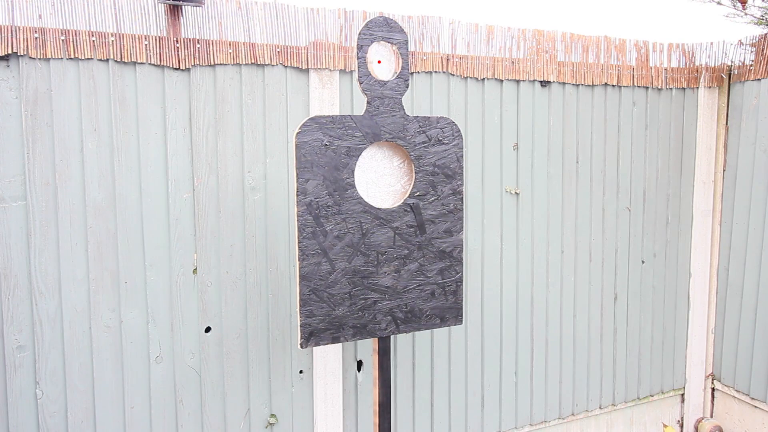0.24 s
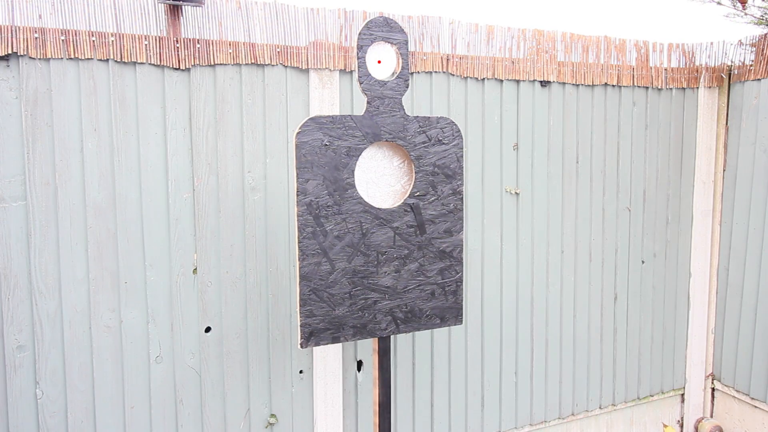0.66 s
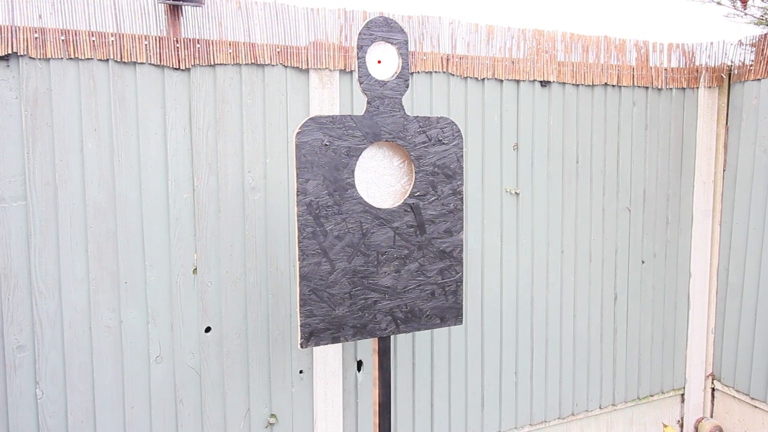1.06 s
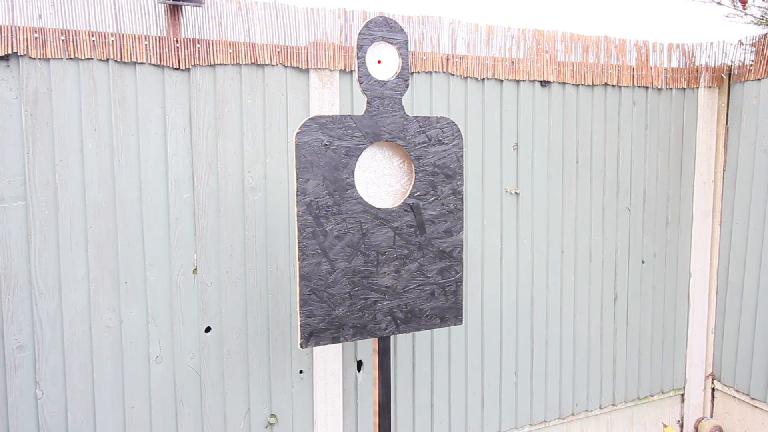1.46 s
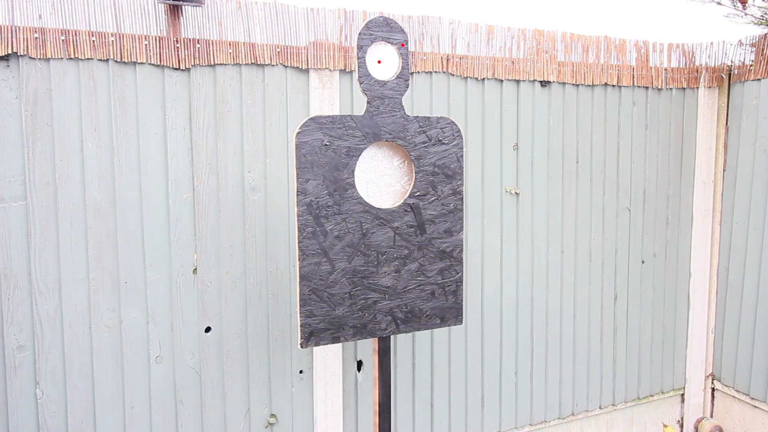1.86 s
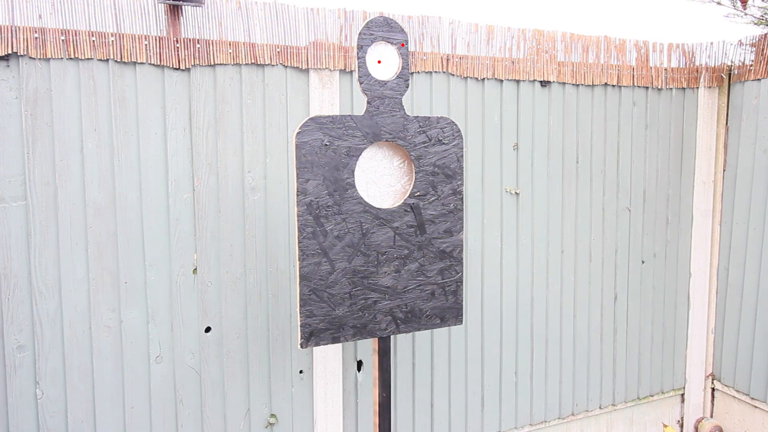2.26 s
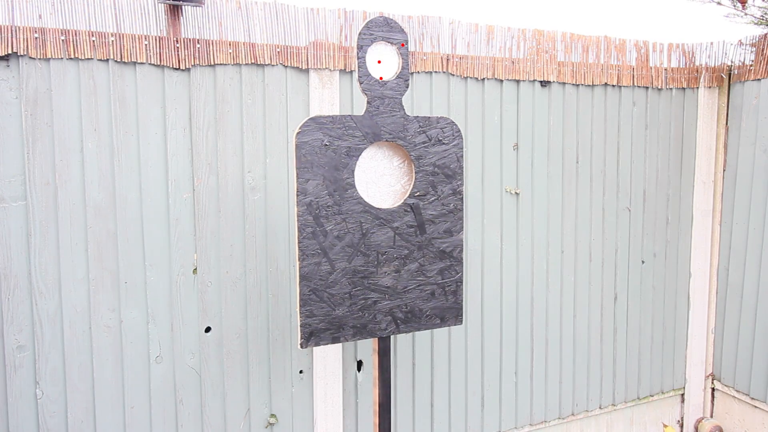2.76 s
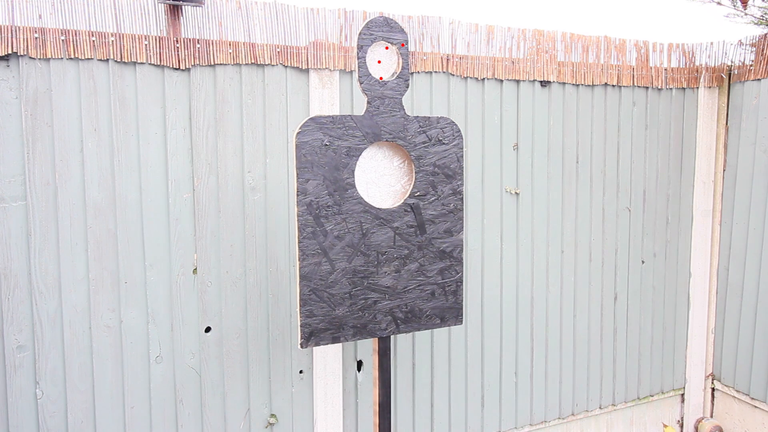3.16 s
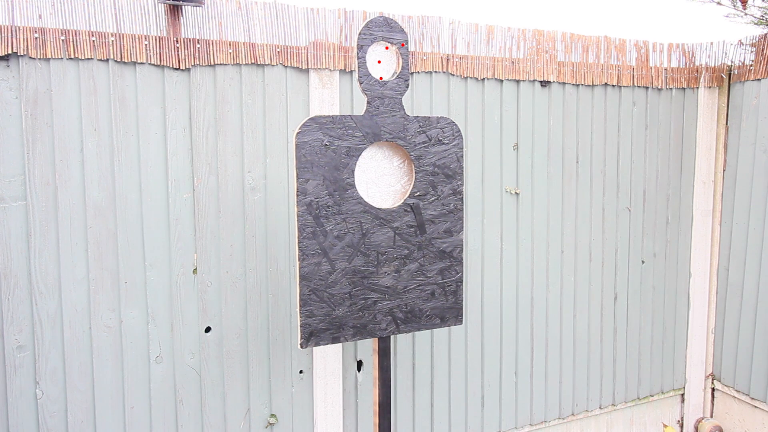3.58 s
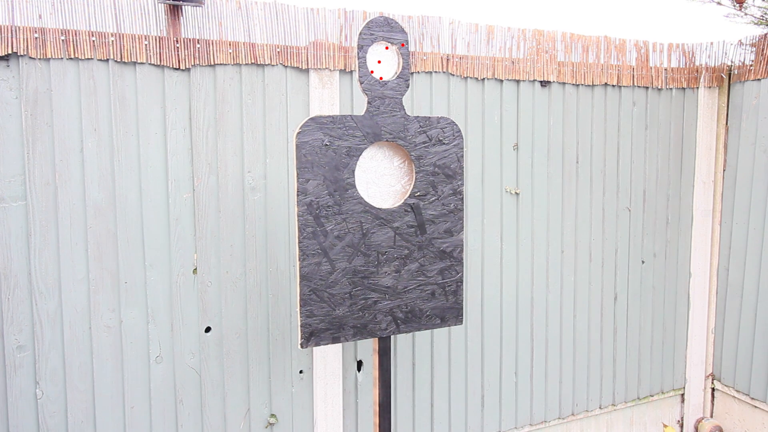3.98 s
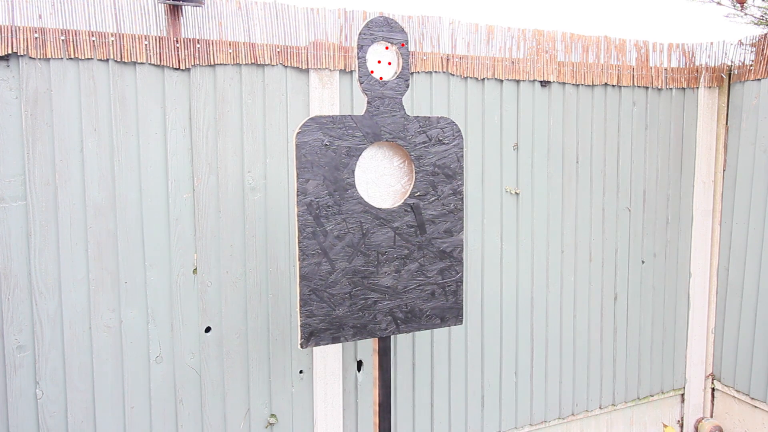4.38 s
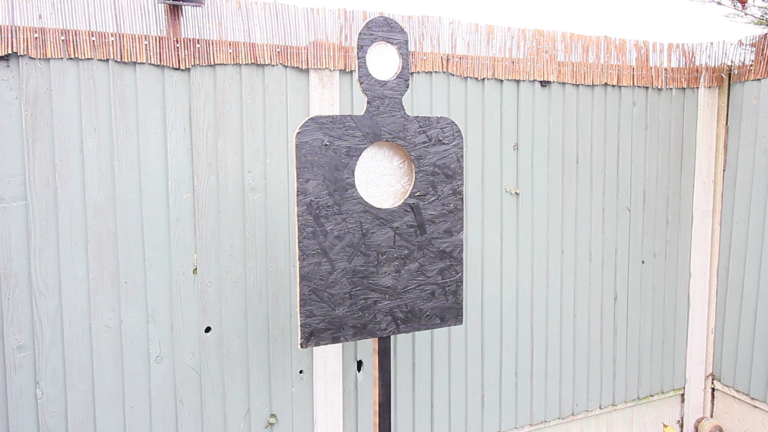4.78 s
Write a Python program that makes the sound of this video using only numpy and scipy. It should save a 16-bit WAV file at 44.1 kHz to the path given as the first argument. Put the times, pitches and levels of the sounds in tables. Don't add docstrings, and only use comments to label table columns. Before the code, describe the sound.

Near microphone at a target board outdoors: each shot is a hollow pop with a gas puff, a brief rising hiss, then a sharp crack some 85 milliseconds later and a ringing tail. The first hit comes immediately, then a quieter gap with small metallic clicks, then five spaced shots. The background ducks at each bang and swells back with traffic rumble and gusty wind; three abrupt cuts change the ambience.

```python
import sys
import numpy as np
from scipy import signal
from scipy.fft import rfft, irfft
from scipy.io import wavfile
from scipy.ndimage import uniform_filter1d

SR = 44100
rng = np.random.default_rng(int(sys.argv[2]) if len(sys.argv) > 2 else 0)


def store_wav(level_fs):
    pcm = np.round(np.clip(np.atleast_2d(level_fs), -1, 1) * 32767)
    wavfile.write(sys.argv[1], SR, pcm.T.astype(np.int16))


def natural_amplitude(level_db):
    exponent = np.asarray(level_db, float) / 20
    return 10 ** exponent


N = 221689

SHOT_TIMES = [-.0535, 1.7574, 2.352, 3.0475, 3.7779, 4.394]
# t/s, crack level/dB, board ring level/dB, yard tail level/dB
HITS = [
    (0.0334, -5.5, -9, -22),
    (1.8425, -1.5, -16.5, -20),
    (2.4381, -3.5, -16, -19.5),
    (3.1337, -8.5, -7, -22),
    (3.8641, -5, -17.5, -19),
    (4.4813, -6, -10, -22.5),
]
CHANGES = [-1, .378, 3.438, 4.728, 9]
# gain at its start/dB, opening rumble level/dB, rumble fade/(dB/s)
TAKES = [(-25, -63, 10), (-14, -53, 110), (-20.5, -55, 200), (-10, -56, 40)]
# f/Hz, level/dB
SCATTER = [(88, -42), (150, -4), (303, -14.5), (439, -2), (1340, -6.5), (1500, -1), (1900, -8),
           (2060, -5.5), (4080, -5.5), (5680, -13.5), (16000, -28.5)]


def evened(x):
    return x / np.sqrt(np.mean(x ** 2) + 1e-20)


def read(points, hz):
    f, value = np.transpose(points)
    return np.interp(np.log(hz + 1), np.log(f + 1), value)


def add(mix, s, sound):
    take = np.searchsorted(CHANGES, s + np.argmax(abs(sound)) / SR)
    begin, end = max(CHANGES[take - 1], 0) * SR, min(CHANGES[take] * SR, N)
    at = round(s * SR) + np.arange(len(sound))
    heard = (at >= begin) & (at < end)
    mix[at[heard]] += sound[heard]


def highpass(x, hz):
    return signal.lfilter(*signal.butter(2, hz, "high", fs=SR), x)


def resonance(x, hz, width):
    return signal.lfilter(*signal.iirpeak(hz, hz / width, SR), x)


def noise(colour, size, t60=None, patchy_db=0.):
    hz = np.fft.rfftfreq(256, 1 / SR)
    t = np.arange(size // 64 + 5) * 64 / SR
    a, b, patches = rng.standard_normal((len(t), len(hz), 3)).T
    patches = uniform_filter1d(patches, size=3, axis=0)
    patches = evened(uniform_filter1d(patches, size=30, axis=1))
    shape = natural_amplitude(read(colour, hz))
    shape = shape / np.linalg.norm(shape)
    fade_db = -60 * t / read(t60, hz)[:, None] if t60 else 0
    z = (a + 1j * b) * shape[:, None] * natural_amplitude(fade_db + patchy_db * patches)
    return signal.istft(z, nperseg=256, noverlap=192)[1][:size]


def coloured(x, colour):
    gain = natural_amplitude(read(colour, np.fft.rfftfreq(len(x), 1 / SR)))
    return evened(irfft(rfft(x) * gain, len(x)))


def lingering(bands, t60, size):
    t = np.arange(size) / SR
    out = np.zeros(size)
    for hz, width, db in bands:
        width = max(width, 45)
        held = resonance(resonance(rng.standard_normal(size), hz, width), hz, width)
        out += natural_amplitude(db - 60 * t / read(t60, hz)) * evened(held)
    return out


def shot(pop_db, ring_db, scatter_db, hiss_db, yard):
    # t/ms, level/dB
    arrivals = [(0.1, -3), (1.58, -4.5), (2.78, -3.1), (4.03, -6.5), (5.75, -4.2), (7.77, -6.5),
                (12.39, -0.2), (13.05, -11.1), (13.8, -5.9), (14.37, -5.2), (16.32, -13.5), (17.68, -9.8),
                (19.65, -7.7), (21.6, -10.0)]
    # f/Hz, level/dB, start/ms, swell/ms, crest/ms
    barrel = [(763, -6.5, -2.5, 1.36, -0.02), (275, -15.5, -3.5, 2.8, -0.52), (400, -20, 3, 2.2, -0.34),
              (1040, -17, 0, 1.4, 0.12), (435, -24, 8, 5, 0), (930, -22, 3, 3.5, 0)]
    # t/ms, level/dB
    echoes = [(-5, -18), (0, -14), (3, -2), (10, 1), (14.5, 4), (19, 1.5), (25, -3.5), (47, -2.5),
              (58, -9.5), (89, -9.5), (220, -50)]
    # f/Hz, level/dB
    pellet = [(180, -43), (300, -21.5), (1080, -8), (1280, -5), (2140, -1), (2480, -2.5), (4990, -12),
              (8090, -16.5), (16000, -30.5)]
    ms = np.arange(len(yard)) * 1000 / SR - 5
    spikes, ring = 0, 0
    for at, db in arrivals:
        push = np.exp(-.5 * ((ms - at) / .046) ** 2)
        suck = np.exp(-.5 * ((ms - at + .3) / .19) ** 2)
        spikes = spikes + natural_amplitude(db) * (push - .242 * suck)
    for hz, db, start, swell, crest in barrel:
        u = np.maximum(ms - start, 0) / swell
        ring = ring + natural_amplitude(db) * u ** 2 * np.exp(-u) * np.cos(2 * np.pi * hz * (ms - crest) / 1000)

    walls = 0.7 * yard + 0.52 * noise(SCATTER, len(ms), patchy_db=-2.0)
    bass = walls - highpass(walls, 600)
    slats = resonance(walls, 1700, 600)
    late = 1 / (1 + np.exp((30 - ms) / 3))
    walls = walls + (natural_amplitude(-3) * slats - .4 * bass) * late
    scatter = natural_amplitude(scatter_db + np.interp(ms, *np.transpose(echoes))) * walls

    closing_db = np.where(ms < 87, hiss_db + 0.49 * (ms - 80), -120)
    hiss = natural_amplitude(closing_db) * noise(pellet, len(ms), patchy_db=0.5)
    return natural_amplitude(pop_db) * (spikes + natural_amplitude(ring_db + 3.5) * ring + scatter) + hiss


def jet(pop_db):
    # f/Hz, level/dB
    gas = [(2350, -33.5), (4000, -2.5), (8390, -3.5), (15200, -6), (16200, -15), (16500, -49)]
    leak_db, jet_db, jet_ms = -44, -29, 5
    ms = np.arange(2000) * 1000 / SR - 5
    puff = np.where(ms < 0, natural_amplitude(leak_db), natural_amplitude(jet_db) * np.exp(-ms / jet_ms))
    return natural_amplitude(pop_db) * puff * coloured(rng.standard_normal(len(ms)), gas)


def fire_pistol(gun):
    levels = [
        (-9, -3, -17, -25.5),
        (-3.5, 4.5, -18.5, -27.5),
        (-12, 0.5, -15.5, -28.5),
        (-7, -1, -19.5, -27.5),
        (-4.5, -1, -20, -32.5),
        (-9.5, -0.5, -17, -26.5),
    ]
    yard = noise(SCATTER, 9500, patchy_db=0.0)
    for s, row in zip(SHOT_TIMES, levels):
        add(gun, s - .005, shot(*row, yard))
        add(gun, s - .005, jet(row[0]))


def burst(t, ms, tau):
    return np.exp(-np.maximum(t - ms / 1000, 0) / tau) * (t >= ms / 1000)


def through(colour, path):
    return [(hz, .6 * read(colour, hz) + read(path, hz)) for hz in np.geomspace(200, 16000, 60)]


def hit(crack_db, ring_db, near_db, colour, bands, returns):
    # t/ms, level/dB
    house = [(110, -44.5), (122.5, -44.5), (137, -50), (150, -52)]
    # f/Hz, level/dB
    wall = [(300, 1), (1500, 2), (4000, 0), (6500, 3), (9000, -14), (16000, -25)]
    # f/Hz, level/dB
    far_path = [(300, 7.5), (500, 1), (1200, 3.5), (2200, 2), (4000, -2), (6500, -4.5), (9000, -3),
                (12000, -9), (16000, -22)]
    # f/Hz, T60/s
    near_t60 = [(300, 0.19), (2000, .12), (6000, 0.13), (15000, 0.08)]
    far_t60 = [(300, 0.55), (1500, .7), (4000, 0.65), (8000, 0.42), (12000, 0.4), (15000, .22)]
    t = np.arange(30000) / SR
    cracks = sum(natural_amplitude(db) * burst(t, ms, .00145) for ms, db, _ in returns)
    slaps = sum(natural_amplitude(db) * burst(t, ms, .0056) for ms, db in house)
    slaps = slaps * noise(through(colour, wall), len(t))
    direct = highpass(natural_amplitude(crack_db) * (noise(colour, len(t)) * cracks + slaps), 280)
    board = sum(natural_amplitude(db + 9) * resonance(direct, hz, width) for hz, width, db in bands)
    near = noise(colour, len(t), near_t60, 1.5)
    far = noise(through(colour, far_path), len(t), far_t60, 2.2)
    far = far + natural_amplitude(-6.5) * lingering(bands, far_t60, len(t))
    tails = (1 - np.exp(-t / .004)) * (natural_amplitude(near_db) * near + natural_amplitude(near_db - 21) * far)
    return direct + natural_amplitude(ring_db) * board + tails


def plate(modes, returns):
    snap_s, swell_s = .00035, .003
    t = np.arange(18000) / SR
    ring = sum(natural_amplitude(db - 60 * t / t60) * np.sin(2 * np.pi * hz * t) for hz, db, t60 in modes)
    ring = ring * (1 - np.exp(-t / swell_s))
    snaps = 0
    for ms, _, db in returns:
        since = t - ms / 1000
        snaps = snaps + natural_amplitude(db) * np.exp(-abs(since - snap_s / 2) / snap_s) * (since >= 0)
    return ring + snaps * evened(highpass(rng.standard_normal(len(t)), 8000))


def strike_board(gun):
    # f/Hz, level/dB
    colours = [
        [(180, -61), (300, -35.5), (1930, -13.5), (2250, -2), (2790, -20.5), (4370, -7), (5080, -22.5),
         (6520, -14.5), (16000, -18.5)],
        [(180, -49.5), (300, -19), (678, -10), (1340, -15.5), (1580, -7), (2570, -9), (4590, -2.5), (5250, -5),
         (16000, -28)],
        [(180, -58.5), (300, -36), (650, -29), (1250, -11), (1580, -2), (1750, -13.5), (1870, -10),
         (3240, -11.5), (4830, -3), (8500, -15), (16000, -32)],
        [(180, -59), (300, -32.5), (2030, -14), (2250, -2.5), (2840, -15), (4370, -4.5), (5160, -16.5),
         (5900, -2.5), (16000, -14.5)],
        [(180, -46), (300, -22.5), (1170, -9.5), (1510, -7), (1750, -15), (2930, -4), (5800, -12), (8790, -9.5),
         (16000, -14.5)],
        [(180, -56.5), (300, -36.5), (2000, -18), (2250, -5), (2840, -11), (4440, -2), (4910, -11),
         (6520, -8.5), (16000, -18.5)],
    ]
    # f/Hz, width/Hz, level/dB
    bands = [
        [(2277, 60, -7), (3640, 150, -9), (4231, 160, -10), (6350, 320, -5.5), (8100, 290, -6)],
        [(1034, 60, -9), (1680, 150, .5), (1970, 150, 0), (2850, 200, -5), (4740, 400, -5), (6650, 450, -6.5)],
        [(1620, 110, -2), (2050, 140, 0), (4500, 500, -10), (7400, 880, -12.5)],
        [(444, 34, -3.5), (4500, 450, -6), (5900, 260, 0), (6500, 200, -3), (8500, 500, -5), (11200, 400, -9.5)],
        [(1190, 46, -3), (2030, 130, -1.5), (6330, 400, -27), (8610, 600, -6), (9860, 500, -9)],
        [(420, 60, -3), (2240, 60, -8), (3730, 70, -5), (4460, 70, -5), (6500, 350, -2), (7750, 300, -13)],
    ]
    # t/ms, level/dB, bright snap level/dB
    returns = [
        [(0, 0, -13), (2.9, -1, -10), (5.3, -4, -17), (7.1, -6, -28), (11, -17, -34), (16, -19, -34)],
        [(0, 0, -14), (3.2, 0, -16), (5.3, -5, -28), (7.2, -7, -25), (10.5, -17, -36), (12.5, -18, -36)],
        [(0, 0, -21), (3.1, -1, -21), (5.3, -3, -21), (7, -7, -30), (9.5, -17, -38), (12.5, -19, -38)],
        [(0, 1, -10), (3.2, -1, -8), (5.1, -5, -16), (7.7, -7, -22), (12.2, -16, -27), (15.9, -17, -30)],
        [(0, 0, -9), (2.9, -2, -8), (5.3, -3, -15), (7.5, -8, -23), (10.5, -16, -32), (14, -17, -33)],
        [(0, 3, -8), (2.8, -1, -7), (5.3, -4, -13), (7.2, -8, -27), (10, -17, -31), (13.5, -18, -35)],
    ]
    # f/Hz, level/dB, T60/s
    modes = [
        [(2250, -14, .045), (4242, -18, .06), (6513, -28, .05), (8306, -22, .06), (2277, -40, .22)],
        [(1593, -22, .09), (1927, -25, .09), (3036, -22, .05), (3919, -24, .05), (4699, -20, .05)],
        [(1593, -19, .09), (1862, -24, .1), (4699, -19, .04), (5485, -21, .04)],
        [(2255, -29, .07), (4521, -25, .07), (6013, -20, .07), (6702, -18, .06), (8850, -23, .07),
         (5860, -40, .18), (5960, -44, .2), (6480, -50, .3)],
        [(1507, -26, .07), (2164, -27, .07), (3036, -26, .06), (3956, -23, .05), (4640, -24, .05),
         (8597, -21, .05)],
        [(2234, -19, .065), (3730, -31, .12), (4500, -20, .07), (6352, -22, .05), (6729, -20, .05),
         (2240, -41, .25), (3735, -54, .7), (4447, -43, .2), (5846, -36, .12)],
    ]
    for (s, *levels), colour, band, paths, mode in zip(HITS, colours, bands, returns, modes):
        add(gun, s, hit(*levels, colour, band, paths))
        add(gun, s, plate(mode, paths))


def click(db, hz, t60, rustle):
    t = np.arange(9000) / SR
    rattle = rng.standard_normal(len(t)) * natural_amplitude(-60 * t / t60)
    held = resonance(rattle, hz, hz / 26)
    broad = resonance(rattle, hz, hz / .9)
    rustle = np.clip(rustle, 0, 1)
    return natural_amplitude(db) * ((1 - rustle) * held / abs(held).max() + rustle * broad / abs(broad).max())


def splinters(db):
    # f/Hz, level/dB
    colour = [(180, -65), (300, -37), (456, -17.5), (660, -19.5), (987, -8), (1630, -5.5), (2650, -4),
              (6780, -12), (15200, -6), (16500, -24)]
    # f/Hz, width/Hz, level/dB
    metal = [(996, 67, -6), (1440, 58, -3.5), (1800, 90, -7), (2820, 90, -9), (3260, 45, -6),
             (3650, 60, -7), (8340, 50, -6), (11600, 60, -11)]
    # f/Hz, T60/s
    t60 = [(500, 0.99), (1500, 0.71), (4000, 0.45), (9000, .28), (15000, 0.18)]
    t = np.arange(20000) / SR
    patter = noise(colour, len(t), t60, 3.) + natural_amplitude(-9.5) * lingering(metal, t60, len(t))
    return natural_amplitude(db) * patter * (1 - 0.4 * np.exp(-t / 0.015))


def rain_splinters(gun):
    # t/s, level/dB, f/Hz, T60/s, share of broad rustle
    tinkles = [(4.0185, -34, 2650, .1, .4), (4.023, -38, 4550, .1, .4), (4.02, -43, 6500, .15, .9),
               (4.088, -46, 1000, .07, .05), (4.062, -45, 3260, .3, 0), (4.165, -52, 3250, .12, 0),
               (4.033, -50, 1000, .25, 0), (3.252, -48, 5900, .06, .1), (1.955, -48, 1030, .12, 0),
               (1.995, -52, 1600, .45, 0), (4.515, -48, 500, .25, .05), (4.57, -58, 300, .3, 0),
               (3.195, -50, 440, .25, .05), (3.23, -62, 220, .3, 0), (.152, -44, 2600, .03, .9),
               (.143, -50, 6700, .03, .2), (3.9, -46, 900, .15, .3), (4.08, -51, 1460, .7, 0),
               (4.13, -52, 1000, .7, 0), (3.2, -54, 5950, .6, 0)]
    add(gun, 4.0185, splinters(-41.5))
    for s, *voice in tinkles:
        add(gun, s, click(*voice))


def handle_pistol(mix):
    # t/s, level/dB, f/Hz, T60/s, share of broad rustle
    touches = [(0.309, -57, 5200, .02, 0.85), (.381, -62, 9300, .02, 0.12), (0.384, -52, 4300, 0.095, 0.3),
               (0.387, -60, 9000, .02, .15), (.3925, -58, 9400, .02, .15), (.3925, -50, 3900, 0.044, 0.4),
               (.385, -48, 540, 0.15, 0.4), (.386, -54, 1500, .1, .7), (0.407, -50, 2900, 0.17, .1),
               (.414, -58, 5450, 0.033, 0.34), (.62, -63.5, 6450, .15, .1), (.7592, -52, 4970, 0.033, 0.76),
               (.7721, -49.5, 6000, .04, 0.67), (0.7773, -41.5, 3570, 0.12, 0.65),
               (1.314, -52, 5000, .03, 0.81), (3.441, -54, 3880, .04, 0.44), (3.452, -57, 4500, .04, .4),
               (3.668, -60, 3600, 0.018, .6), (3.6685, -51.5, 5000, .02, 0.68), (3.736, -56, 1850, 0.1, .2),
               (3.52, -55, 660, 0.49, .1), (3.61, -52.5, 634, 0.53, .1), (4.602, -43, 3800, .035, .8),
               (4.729, -56, 2860, .5, .1), (4.73, -68, 6350, 0.34, .1)]
    for s, *voice in touches:
        add(mix, s, click(*voice))


def buffet(db, hz, push):
    u = np.arange(-.03, .03, 1 / SR) * hz
    return np.sign(push) * natural_amplitude(db) * np.cos(2 * np.pi * u) * np.exp(-(u / 0.55) ** 2)


def bump_microphone(mix):
    # t/s, level/dB, f/Hz, push or pull
    eddies = [(1.9924, -43.5, 107, 1), (2.01, -43.5, 175, -1), (2.0247, -48, 130, -1),
              (2.0588, -46, 85.6, 1), (2.0897, -38, 147, -1), (2.1034, -36, 155, -1), (2.138, -48.5, 98, 1),
              (2.1533, -43.5, 121, 1), (2.179, -43.5, 138, 1), (2.2574, -46, 141, 1), (2.27, -34, 143, 1),
              (2.2928, -35.5, 124, -1), (2.323, -39, 138, -1), (2.339, -42.5, 95, -1),
              (2.7905, -48.5, 143, 1), (2.8902, -42, 117, 1), (2.996, -47, 136, -1), (3.526, -43, 110, 1),
              (3.575, -42, 70, -1), (3.5967, -36, 99, 1), (3.6096, -35, 119, 1), (3.6581, -32.5, 79, 1),
              (3.677, -31, 195, -1), (3.696, -36, 83, -1), (3.7146, -35, 64, -1), (3.7302, -27, 146, 1),
              (3.7573, -34, 65, 1), (3.97, -51.5, 79, -1), (4.2696, -45, 102, 1), (4.288, -45, 73, 1),
              (2.086, -46, 520, 1), (2.102, -46, 330, -1), (2.275, -43, 330, 1), (3.672, -42, 400, 1),
              (3.683, -42, 330, -1), (3.722, -40, 420, 1), (3.735, -42, 350, -1), (1.995, -52, 350, 1)]
    # t/s, level/dB, f/Hz, upward or downward swing
    low_thumps = [(1.7595, -33, 140, -1), (3.0495, -47, 140, -1), (4.396, -47, 140, -1), (1.845, -33, 90, -1),
                  (2.439, -37, 100, 1), (3.135, -52, 100, -1), (3.865, -40, 110, 1)]
    for s, *eddy in [*eddies, *low_thumps]:
        add(mix, s - .03, buffet(*eddy))


def drone(db, hz, width, fall):
    t = np.arange(-.4, .4, 1 / SR)
    held = resonance(resonance(rng.standard_normal(len(t)), hz, width), hz, width)
    return natural_amplitude(db - 9 * (t / fall) ** 2) * evened(held)


def pass_drones(mix):
    swells = [(.87, -50.5, 247, 14, .17), (.98, -57, 305, 20, .1), (1.06, -56, 1000, 40, .1),
              (1.2, -54, 950, 300, .12), (.75, -56, 1000, 300, .12), (1.33, -52, 310, 40, .05),
              (1.43, -49, 160, 60, .1), (1.4, -50, 360, 200, .1), (1.36, -54, 700, 200, .07),
              (.43, -63, 230, 60, .05), (.45, -60, 400, 80, .08), (.55, -58, 270, 30, .05),
              (4.95, -54, 260, 40, .12)]
    for s, *band in swells:
        add(mix, s - .4, drone(*band))


def gain_control(t):
    crack_duck_db, pop_duck_db, recover_db_per_s, knee_db = -37, -22, 44, 2.5
    resets = [(row[0], crack_duck_db) for row in HITS]
    resets += [(s, pop_duck_db) for s in SHOT_TIMES[1:]]
    resets += [(max(s, 0), take[0]) for s, take in zip(CHANGES, TAKES)]
    s, db = np.transpose(sorted(resets))
    last = np.searchsorted(s, t, side="right") - 1
    climb_db = db[last] + recover_db_per_s * (t - s[last])
    return -knee_db * np.logaddexp(0, -climb_db / knee_db)


def wind(t):
    # peak t/s, level/dB, time to rise 20 dB/s, time to fall 20 dB/s
    gusts = [(1.15, -51, .4, .15), (1.31, -40, .05, .4), (1.44, -39, .08, .5), (1.745, -36, .04, .03),
             (2.08, -19, .25, .14), (2.265, -21, .04, .3), (2.78, -35, .07, .12), (2.886, -33, .08, .06),
             (3.035, -41, .11, .05), (3.44, -30, .03, .6), (3.765, -26, .4, .025), (3.97, -25, .2, .045),
             (4.278, -33, .11, .09)]
    # f/Hz, level/dB
    colour = [(12, -39.5), (20, -8), (92, -3), (220, -10.5), (300, -21), (392, -17), (500, -33.5),
              (650, -64), (1100, -120)]
    calm_db = -55
    lumps = uniform_filter1d(uniform_filter1d(rng.standard_normal(N), 500), 500)
    lumps = natural_amplitude(5.9 * evened(lumps))
    gusts_db = [db - 20 * np.maximum((s - t) / rise, (t - s) / fall) for s, db, rise, fall in gusts]
    level_db = np.maximum(np.max(gusts_db, axis=0), calm_db) - 6.0
    return natural_amplitude(level_db) * evened(lumps * coloured(rng.standard_normal(N), colour))


def background():
    # f/Hz, level/dB
    road = [(18, -40), (30, -5), (130, -7), (162, -6), (206, -9.5), (246, -2), (439, -9), (501, -4.5),
            (654, -7.5), (974, -6), (2120, -21.5), (2950, -25), (6000, -37.5), (7800, -65), (13200, -120)]
    # t/s, level/dB
    passing = [(0, -42), (.37, -42), (.385, -50), (.55, -50), (.75, -45.3), (1.7, -46.5), (2.2, -48),
               (3.4, -48), (3.6, -51), (4.3, -45), (4.75, -43.5), (5.03, -43)]
    # f/Hz, level/dB
    self_noise = [(2350, -33.5), (4000, -2.5), (8390, -3.5), (15200, -6), (16200, -15), (16500, -49)]
    t = np.arange(N) / SR
    gain = natural_amplitude(gain_control(t))
    take = np.searchsorted(CHANGES, t, side="right") - 1
    _, rumble_db, fade = np.transpose(TAKES)[:, take]
    rumble = natural_amplitude(rumble_db - fade * (t - np.maximum(CHANGES, 0)[take]))

    roll, sizzle = np.zeros(N), np.zeros(N)
    for s, _, ring_db, _ in HITS:
        add(roll, s, natural_amplitude(-55.5 - 95 * t[:SR]))
        add(sizzle, s, natural_amplitude(2 * ring_db - 35 - 135 * t[:SR]))

    flat = [(20, 0), (20000, 0)]
    wash = coloured(noise(flat, N, patchy_db=1.3), road)
    thin = highpass(wash, 280)
    traffic = gain * natural_amplitude(np.interp(t, *np.transpose(passing))) * wash
    traffic = traffic + (rumble + roll) * thin + natural_amplitude(-70.5) * (wash - thin)
    hiss = (gain * natural_amplitude(-68.5) + sizzle) * coloured(rng.standard_normal(N), self_noise)
    return traffic + hiss + gain * wind(t)


def scene():
    gun, mix = np.zeros(N), background()
    fire_pistol(gun)
    strike_board(gun)
    rain_splinters(gun)
    handle_pistol(mix)
    bump_microphone(mix)
    pass_drones(mix)
    return (mix + highpass(gun, 110))[None]


def top_cut(x):
    return signal.sosfilt(signal.butter(12, 16980, fs=SR, output="sos"), x)


def record(dry):
    band = signal.oaconvolve(dry, signal.firwin(255, 15800, fs=SR)[None], "same")
    limit = 0.52
    flat = band / (1 + abs(band / limit) ** 8) ** (1 / 8)
    smooth = signal.firwin(255, 16700, window=("kaiser", 9), fs=SR)
    return top_cut(signal.oaconvolve(flat, smooth[None], "same"))


dry = scene()
out = record(dry)
store_wav(out)
```